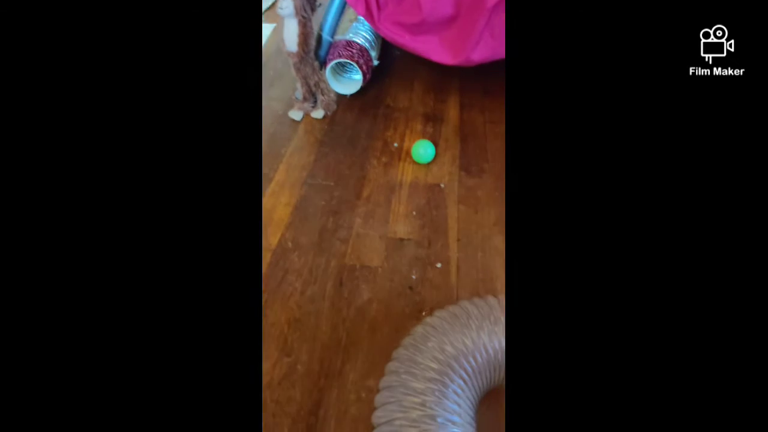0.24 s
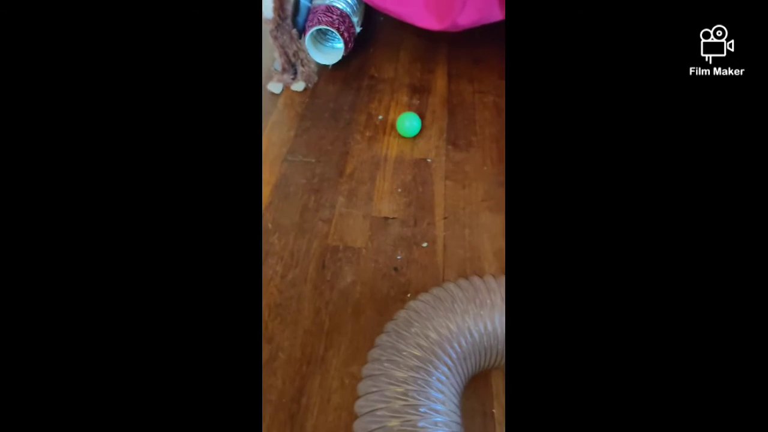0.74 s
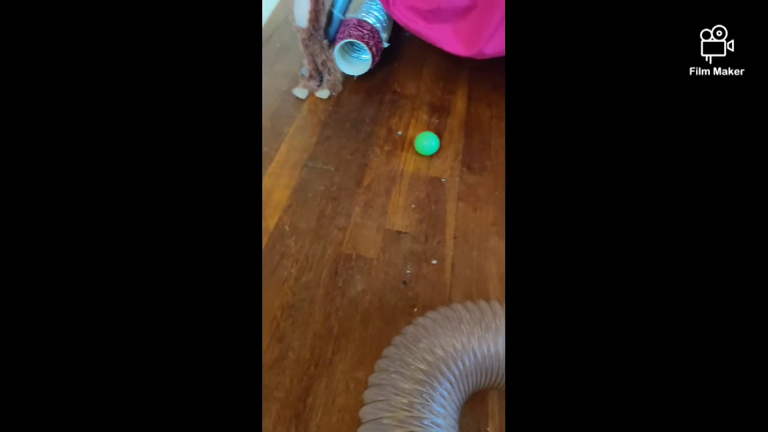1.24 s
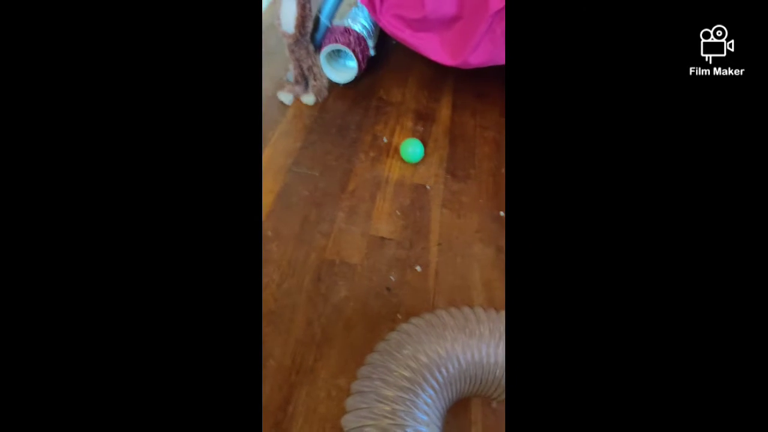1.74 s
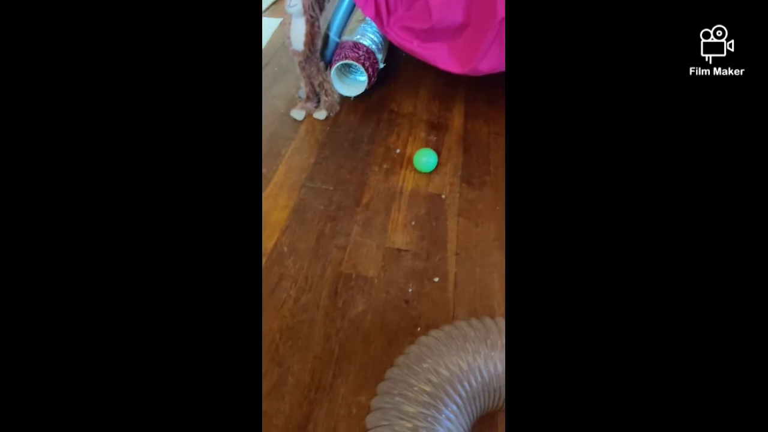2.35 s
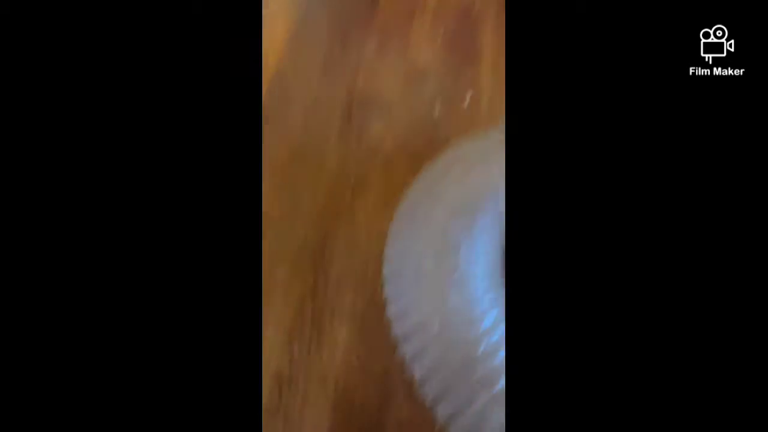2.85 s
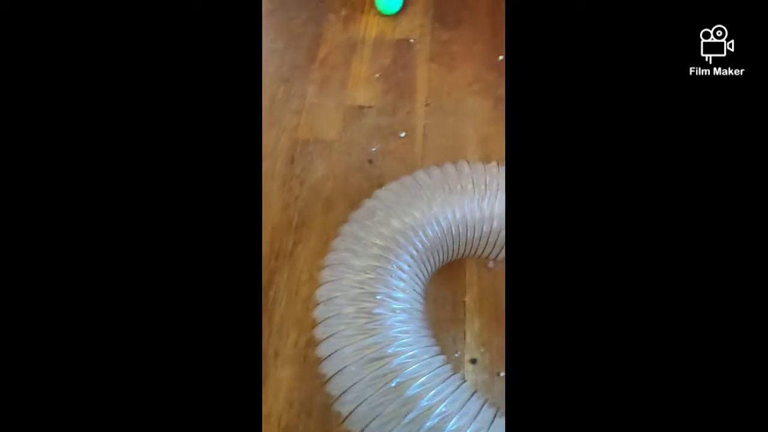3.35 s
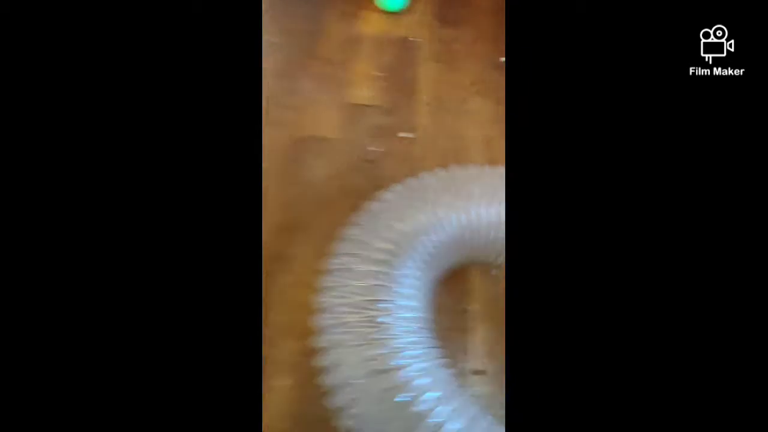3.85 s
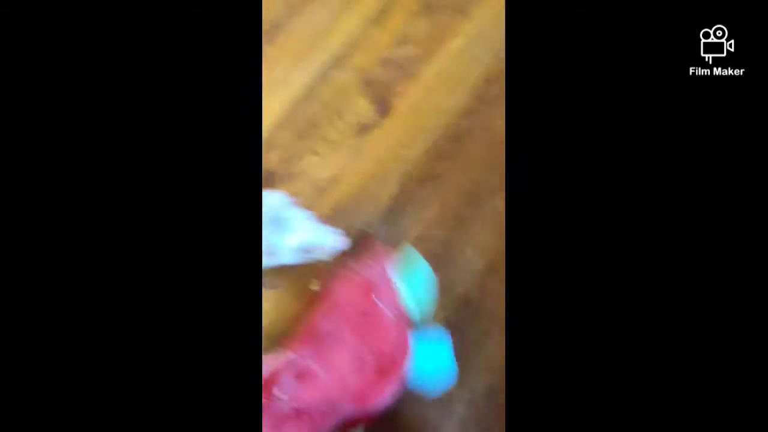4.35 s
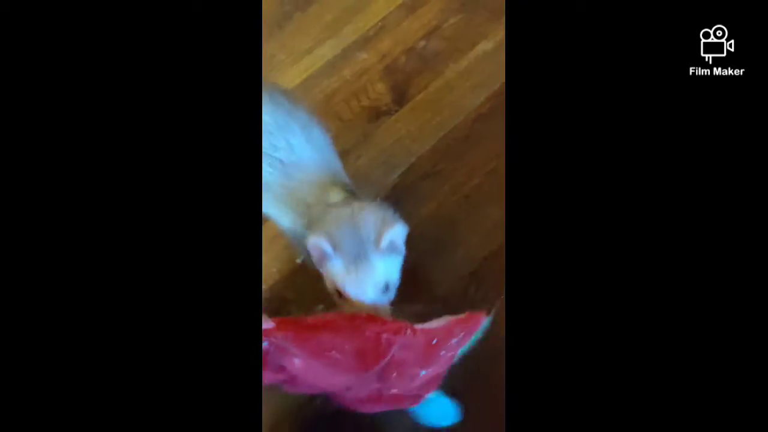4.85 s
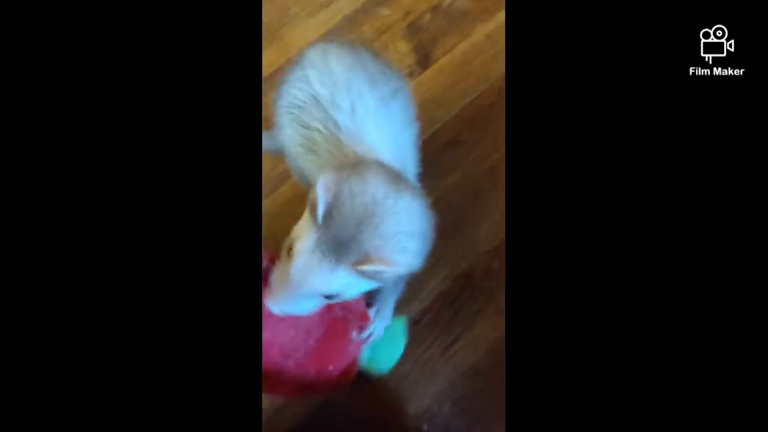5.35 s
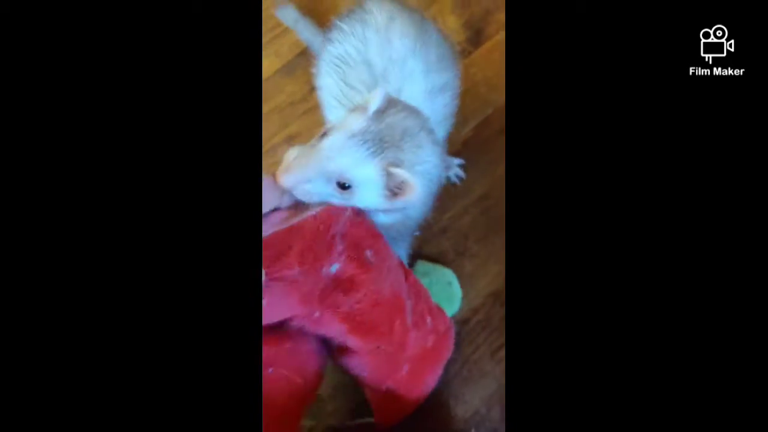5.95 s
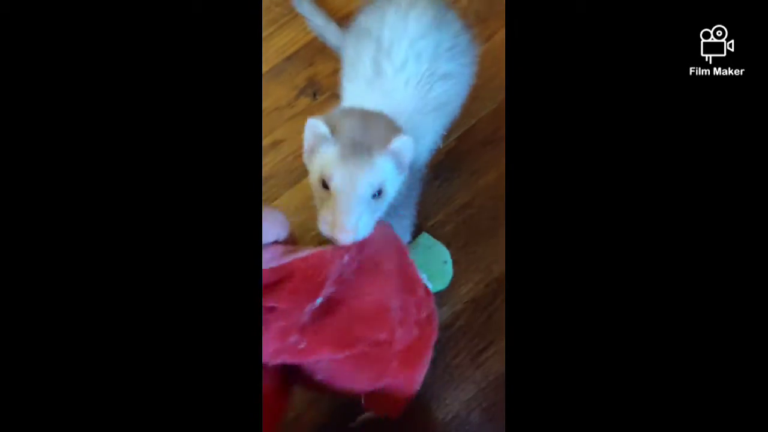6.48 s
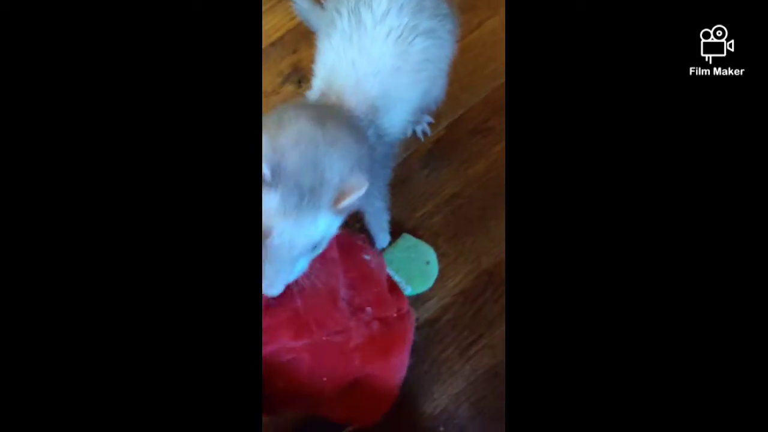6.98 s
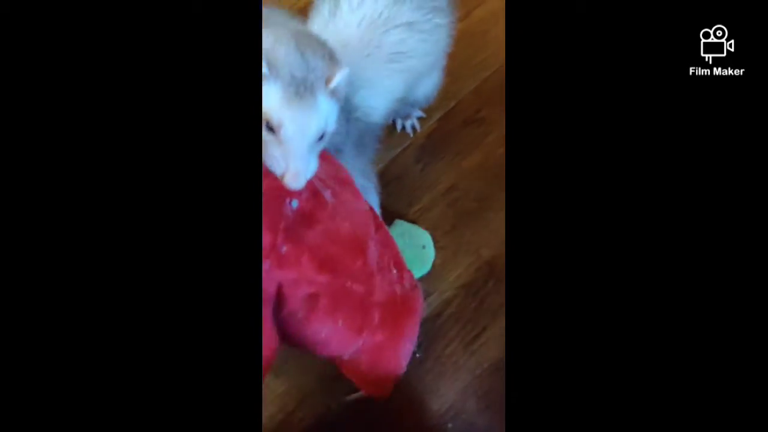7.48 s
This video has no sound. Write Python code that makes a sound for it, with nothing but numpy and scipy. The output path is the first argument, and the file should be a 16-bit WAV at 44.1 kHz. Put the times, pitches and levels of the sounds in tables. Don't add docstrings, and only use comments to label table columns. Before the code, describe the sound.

Close, steady two-note toy squeaks, high on the press and lower on the release, break for a second over quiet thumps, then continue beside a softly chuckling ferret.

```python
import sys
import numpy as np
from scipy import signal
from scipy.fft import rfft, irfft
from scipy.io import wavfile
from scipy.ndimage import uniform_filter1d, map_coordinates

SR = 44100
rng = np.random.default_rng(int(sys.argv[2]) if len(sys.argv) > 2 else 0)


def convert_level_to_amplitude(level_db):
    exponent = np.asarray(level_db, float) / 20
    return 10 ** exponent


def output_pcm(signal):
    pcm = np.clip(np.atleast_2d(signal).T, -1, 1) * 32767
    wavfile.write(sys.argv[1], SR, np.round(pcm).astype(np.int16))


N = 340452

# start_s, rise_s, fall_s, top_pitch_hz, level_db
SQUEEZES = [(-.13, 0.051, 0.015, 1273, -12), (0.2541, .036, .032, 1190, -9.5),
            (0.5791, .027, .034, 1174, -11.5), (0.9106, .036, .032, 1208, -10),
            (1.2114, .022, .032, 1159, -9.5), (1.5072, 0.024, .04, 1156, -9.5),
            (1.8126, 0.029, .037, 1144, -9.5), (2.14, .037, .04, 1164, -10),
            (2.4643, .027, 0.033, 1162, -9.5), (2.745, .024, 0.028, 1173, -10),
            (4.0044, .035, 0.036, 1210, -10), (4.3906, .033, .032, 1209, -10),
            (4.739, .032, .032, 1193, -11.5), (5.1021, .032, .032, 1210, -10),
            (5.439, .03, .028, 1195, -10.5), (5.784, .037, .024, 1201, -10),
            (6.1807, .031, .032, 1200, -10.5), (6.6368, 0.032, .04, 1184, -10.5),
            (7.0598, .03, .044, 1179, -10.5), (7.4773, 0.032, 0.042, 1130, -10)]
# start_s, rise_s, fall_s, top_pitch_hz, level_db
DRAWS = [(.061, 0.02, 0.077, 916, -15.5), (0.4204, .03, 0.06, 922.3, -14.5),
         (0.7271, .031, 0.062, 942, -14.5), (1.0695, .019, 0.063, 920.7, -15),
         (1.3511, 0.021, 0.058, 941, -13.5), (1.656, 0.015, 0.059, 942.7, -13.5),
         (1.9734, 0.019, 0.069, 944.6, -14), (2.3162, 0.026, 0.055, 911, -15.5),
         (2.6304, 0.027, 0.038, 917, -15.5), (2.9174, 0.0065, 0.085, 909.5, -16.5),
         (4.2002, .018, 0.069, 916, -14), (4.5595, 0.022, 0.062, 923, -12),
         (4.9015, 0.011, 0.079, 928, -13), (5.2686, 0.014, 0.062, 912, -14),
         (5.5986, 0.02, 0.053, 905, -15), (5.9562, 0.02, 0.066, 924, -11.5),
         (6.365, .024, 0.077, 933.7, -12), (6.8366, 0.031, 0.063, 910.5, -13),
         (7.2535, 0.02, 0.059, 913.6, -11), (7.6848, .018, 0.12, 900.5, -12)]
SQUEEZE_LAW = dict(catch_hz=1089.6, follows=.03, sag_hz=126.9, sag_hz_per_s=11, bend_up=1.5, bend_down=1.7, first_db=0.56, last_db=-8.5, fade=2, scoop=0.074)
DRAW_LAW = dict(catch_hz=905, follows=0.42, sag_hz=15, sag_hz_per_s=850, bend_up=1.5, bend_down=1.6, first_db=-2, last_db=-9.5, fade=2.96, scoop=.18)
# pitch_hz, level_db
SQUEEZE_HOUSING = [(1150, -11), (2300, -10.5), (3450, -13), (4600, -7.5), (5750, -10.5), (6900, -6.5),
                   (8050, -5), (9200, -17.5), (10350, -21.5), (11500, -25.5), (12650, -24), (13800, -20),
                   (14950, -19.5)]
DRAW_HOUSING = [(900, -6.5), (1800, -9), (2700, -8), (3600, -16), (4500, -15), (5400, -14.5), (6300, -29.5),
                (7200, -10), (8100, -8), (9000, -17.5), (10800, -22.5), (11700, -23), (13500, -26.5),
                (15300, -27)]
# start_s, left_lag_ms, fingers across the vent, twist, vent facing the phone [all -1..1]
HOLD = [(0.06, 0.32, -0.23, -0.32, 0.14), (0.5, 0.24, 0.08, 0.44, 0.3), (0.85, 0.28, -0.21, 0.64, 0.03),
        (1.2, 0.25, -0.03, 0.24, 0.31), (1.55, 0.29, -0.09, 0.93, 0.34), (1.9, 0.29, -0.05, 1, 0.51),
        (2.2, 0.29, -0.11, -0.18, 0.1), (2.5, 0.26, -0.26, 0.2, 0.0), (2.85, 0.23, -0.1, -0.18, -0.02),
        (4.0, 0.28, 0.29, 0.082, -0.12), (4.399, 0.02, -0.21, -0.46, 0.075),
        (4.75, 0.06, 0.21, -0.17, 0.38), (5.15, -0.01, 0.42, 0.0036, 0.78),
        (5.6, -0.084, 0.0048, 0.2, -0.018), (6.1, -0.082, -0.57, -0.81, -0.83),
        (6.6, -0.08, 0.08, -0.38, 0.24), (7.0, -0.016, 0.95, -0.17, -1.1),
        (7.45, -0.088, -0.45, 0.99, -0.88)]
# right_end_db, left_end_db
SQUEEZE_GRIP = [(1150.0, 0.9, 2, -3, -1.8, -7.5), (2300.0, 0.2, 1.5, -2.5, 4, -1),
                (3450.0, 3.6, 1.6, -3, 0.7, -5.5), (4600.0, -6.5, 3.6, 0.9, -3, 8),
                (5670, -3.5, -1.1, 4.5, -8, 2.4), (7000, 2, -3, 1.1, 1.9, -8), (8050.0, 2.1, 7, 1.5, -2, 4),
                (8900, 2.5, 1.5, 1.7, 3, 0)]
DRAW_GRIP = [(905.0, 1.3, -1.4, -0.5, -4.5, 1.7), (1800, -1, -0.7, 3.5, 6, 1),
             (2715.0, 4, 1.4, -5.5, 2.5, -4.9), (3620.0, 1, -1, -5.5, 2.5, -2.2), (4580, -8.5, 4, 0, -7, 4),
             (5400, -4, 1, 8, -8.5, 8.3), (7240.0, -4.5, -1.5, 3.9, -8, -14.5), (8145.0, 1, -3, 3, -7, 4.5)]
# pitch_hz, t60_s
ROOM_DECAY = [(600, 0.37), (1600, 0.3), (4200, 0.38), (8000, 0.28), (14000, 0.21)]
# pitch_hz, level_db
ROOM_COLOUR = [(600, -16), (2000, -11.5), (5000, -11.5), (8000, -8), (14000, -2.5)]
# pitch_hz, level_db
AIR_COLOUR = [(30, -25), (60, -2.5), (120, -4), (220, -6), (350, -13), (550, -14), (800, -20),
              (3000, -23.5), (16000, -32.5)]
# pitch_hz, level_db
TREMOR_COLOUR = [(4, -2), (14, -4), (30, -15.5), (60, -30), (110, -41), (200, -69)]
# middle_s, half_length_s, level_db
JOLTS = [
    (0, 0.12, -39),
    (1.5, .2, -45.5),
    (3.12, .14, -28.5),
    (4.3, 0.32, -42),
    (6.1, 0.12, -48.5),
    (7.7, 0.36, -41.5),
]
# middle_s, half_length_s, level_db
RUBS = [(.1, 0.33, -57), (1.5, 0.63, -52.5), (2.7, 0.097, -56), (3.09, 0.012, -60), (3.42, .04, -64),
        (3.535, .006, -62), (3.955, .005, -67), (4.6, 0.35, -49), (5.45, 0.055, -50.5),
        (5.72, 0.096, -47.5), (6.08, 0.087, -40.5), (6.19, .04, -43.5), (6.42, 0.069, -41.5),
        (6.56, 0.077, -47.5), (6.95, 0.23, -48.5), (6.72, 0.031, -52), (7.05, 0.026, -47.5),
        (7.32, 0.035, -42), (5.05, 0.12, -58), (7.55, 0.029, -54.5)]
# pitch_hz, level_db
PLUSH_COLOUR = [(60, -44), (150, -5.5), (380, -5), (900, -3.5), (3000, -11.5), (6000, -10), (12400, -11.5),
                (16000, -13)]
# middle_s, half_length_s, level_db
THUDS = [
    (3.09, 0.011, -45),
    (3.2, .06, -64),
    (3.28, 0.0088, -56),
    (3.33, .025, -56.5),
    (3.85, 0.086, -61.5),
]
# pitch_hz, level_db
BOARDS_COLOUR = [(50, -25), (120, 4), (400, -3), (1000, -6), (2200, -16), (5000, -32), (16000, -60)]
# start_s, length_s, pitch_hz, level_db, octave_db
CHUCKLES = [(5.429, 0.0091, 204, -41.5, 3), (5.667, 0.041, 220, -39.5, 2), (5.78, 0.043, 197, -50, 7),
            (5.991, 0.07, 213, -46.5, 4), (6.104, .045, 197, -47, 9), (6.416, 0.038, 201, -54, 2),
            (6.49, 0.047, 303, -49, -1), (6.909, 0.057, 292, -45.5, -13), (7.039, 0.025, 231, -44.5, 2),
            (7.208, 0.046, 310, -42, -23), (7.306, 0.039, 232, -45, 7), (7.404, 0.054, 311, -41, -16),
            (7.508, .05, 318, -45.5, -8), (7.665, 0.056, 258, -49.5, -4)]
# pitch_hz, level_db
PUFF_COLOUR = [(60, -30), (150, -3), (300, 0), (550, -4), (900, -8), (2000, -45)]


def unit(x):
    return x / np.sqrt(np.mean(x ** 2) + 1e-20)


def colour(points, hz):
    f, db = np.transpose(points)
    return convert_level_to_amplitude(np.interp(np.log(hz + 1), np.log(f), db))


def wobble(rate, size):
    knots = rng.standard_normal(int(size * rate / SR) + 4)
    return map_coordinates(knots, [np.arange(size) * rate / SR])


def noise(spectrum, alike):
    white = rng.standard_normal((2, N))
    middle, side = irfft(rfft(white) * colour(spectrum, np.fft.rfftfreq(N, 1 / SR)), N)
    turn = np.arccos(np.clip(alike, -1, 1)) / 2
    return unit(np.cos(turn) * middle + np.sin(turn) * side * [[1], [-1]])


def bumps(rows):
    t = np.arange(N) / SR
    return sum(convert_level_to_amplitude(db) ** 2 * np.exp(-((t - s) / half) ** 2) for s, half, db in rows)


def stroke(row, law):
    start, rise, fall, top_hz, db = row
    u = np.arange(7) / 6
    left_to_climb = 1 - u[:-1]
    catch_hz = law["catch_hz"] + law["follows"] * (top_hz - law["catch_hz"])
    sag_hz = law["sag_hz"] + law["sag_hz_per_s"] * fall
    climb = top_hz - (top_hz - catch_hz) * left_to_climb ** law["bend_up"]
    sag = top_hz - sag_hz * u ** law["bend_down"]
    level_db = db + np.r_[law["first_db"] * left_to_climb, law["last_db"] * u ** law["fade"]]
    times = start + np.r_[rise * u[:-1], rise + fall * u]
    return np.transpose([times, np.r_[climb, sag], level_db])


def reed(path, housing, grip, scoop, t):
    s, hz, db = np.transpose(path)
    stop_s = s[-1] + .007
    starting = scoop * np.exp(-np.clip(t - s[0] + 0.0013, 0, 1) / 0.0018)
    stalling = scoop / (1 + np.exp(-(t - stop_s) / 0.0022))
    pitch = uniform_filter1d(np.interp(t, s, hz), size=300) * (1 - starting - stalling)
    level_db = uniform_filter1d(np.interp(t, s, db), size=300)
    order = np.arange(1, 19)[:, None]
    partial_hz = order * pitch
    rise = 1 / (1 + np.exp(-(t - s[0]) / (0.00057 + 0.00041 / order)))
    fall = 1 / (1 + np.exp((t - stop_s) / (0.0014 + 0.0011 / order)))
    size = colour(housing, partial_hz) * colour(grip, partial_hz)
    size = size * convert_level_to_amplitude(0.16 * (level_db - db.max()) * np.log2(order))
    size = size / np.sqrt(np.sum(size ** 2, 0) / 2)
    size = size * convert_level_to_amplitude(level_db) * rise * fall
    phase = 2 * np.pi * np.cumsum(pitch) / SR * order + np.pi / 2 - 0.12 * order ** 1.9
    return size, phase


def room_tail(onset):
    hz, t, z = signal.stft(rng.standard_normal((2, SR // 2)), SR, nperseg=256)
    t60 = np.interp(hz, *np.transpose(ROOM_DECAY))[:, None]
    tail = signal.istft(z * convert_level_to_amplitude(-60 * t / t60), SR, nperseg=256)[1][:, :SR // 2]
    tail = tail * (1 - np.exp(-(np.arange(SR // 2) / SR / onset) ** 2))
    size = tail.shape[1]
    tail = tail / np.linalg.norm(tail[0])
    return irfft(rfft(tail) * colour(ROOM_COLOUR, np.fft.rfftfreq(size, 1 / SR)), size)


def toy():
    lead = SR // 4
    right_lag_ms, left_lag_ms = 0.14, -0.15
    out = np.zeros((2, N + SR + lead))
    hold_s, *held = np.transpose(HOLD)
    strokes = [(row, SQUEEZE_LAW, SQUEEZE_HOUSING, SQUEEZE_GRIP) for row in SQUEEZES]
    strokes += [(row, DRAW_LAW, DRAW_HOUSING, DRAW_GRIP) for row in DRAWS]
    for row, law, housing, shades in strokes:
        lag_ms, *hand = [np.interp(row[0], hold_s, column) for column in held]
        hz, *shade_db, right_db, left_db = np.transpose(shades)
        grip = list(zip(hz, np.dot(hand, shade_db)))
        first = round((row[0] - .02) * SR)
        t = np.arange(first, first + 7000) / SR
        size, phase = reed(stroke(row, law), housing, grip, law["scoop"], t)
        order = np.arange(1, len(size) + 1)[:, None]

        shake = 0.012 * order ** 1.08 * rng.standard_normal(order.shape)
        wave = size * (1 + shake * wobble(700, size=len(t))) * np.exp(1j * phase)

        toward_right = np.clip((lag_ms - left_lag_ms) / (right_lag_ms - left_lag_ms), 0, 1)
        sides_db = left_db + (right_db - left_db) * toward_right
        pan_db = np.interp(order * row[3], hz, sides_db)
        pan_db = pan_db + 0.5 * np.log2(order) * rng.standard_normal(order.shape)
        skew = 0.22 * np.log2(order) * rng.standard_normal(order.shape)
        pair = np.real([np.sum(wave * convert_level_to_amplitude(side * pan_db) * np.exp(1j * side * skew), 0)
                        for side in (.5, -.5)])
        lag_s = lag_ms / 1000 * np.array([[.5], [-.5]])
        lag = np.exp(-2j * np.pi * np.fft.rfftfreq(len(t), 1 / SR) * lag_s)

        wet = signal.fftconvolve(np.real(wave.sum(0))[None], room_tail(onset=0.0015), axes=1)
        place = out[:, lead + first:]
        place[:, :len(t)] += irfft(rfft(pair) * lag, len(t))
        place[:, :wet.shape[1]] += wet
    return out[:, lead:lead + N]


def quiet_room():
    steady_hand_db = -45
    shake = np.sqrt(bumps(JOLTS) + convert_level_to_amplitude(steady_hand_db) ** 2)
    tremor = shake * convert_level_to_amplitude(2.8 * wobble(34, size=N)) * noise(TREMOR_COLOUR, alike=0.23)
    drift_db = 1.2 * wobble(4.4, size=N)
    air = convert_level_to_amplitude(-60 + drift_db) * noise(AIR_COLOUR, alike=0.35)
    return air + tremor * convert_level_to_amplitude([[-7], [5]])


def plush():
    knead_db, pause_s, resume_s = -60, 3.03, 4.05
    t = np.arange(N) / SR
    pumping = uniform_filter1d(((t < pause_s) | (t > resume_s)) * 1., size=3000)
    clumps = convert_level_to_amplitude(1.5 * wobble(40, size=N) + 0.74 * wobble(400, size=N))
    power = bumps(RUBS) + np.abs(pumping) * convert_level_to_amplitude(knead_db) ** 2
    return np.sqrt(power) * unit(clumps * noise(PLUSH_COLOUR, alike=0.83))


def boards():
    return np.sqrt(bumps(THUDS)) * noise(BOARDS_COLOUR, alike=0.43)


def ferret():
    puff_db = -6
    out = np.zeros(N + SR)
    puff = np.pad(noise(PUFF_COLOUR, alike=0.95)[0], (0, SR))
    for s, length, hz, db, octave_db in CHUCKLES:
        span = length * 1.3
        u = np.arange(round(span * SR)) / SR / span
        here = slice(round(s * SR), round(s * SR) + len(u))
        pitch = hz * (1.08 - 0.27 * u + 0.076 * wobble(84, size=len(u)))
        phase = 2 * np.pi * np.cumsum(pitch) / SR
        tone = np.sin(phase) + convert_level_to_amplitude(octave_db) * np.sin(2 * phase + 1) + convert_level_to_amplitude(-7) * np.sin(3 * phase)
        swell = np.sin(np.pi * u ** 0.48) ** 1.7
        out[here] += convert_level_to_amplitude(db) * (unit(tone) + convert_level_to_amplitude(puff_db) * puff[here]) * swell
    return out[:N] * convert_level_to_amplitude([[-.6], [.6]])


def scene():
    return toy() + quiet_room() + plush() + boards() + ferret()


def band_limit(x):
    return signal.sosfilt(signal.butter(12, 16830, fs=SR, output="sos"), x)


def record(dry):
    rounded = dry / (1 + np.abs(dry / .75) ** 5) ** (1 / 5)
    rolloff = 1 + (np.fft.rfftfreq(N, 1 / SR) / 15800) ** 120
    mix = irfft(rfft(rounded) / rolloff, N)
    return band_limit(mix)


dry = scene()
out = record(dry)
output_pcm(out)
```